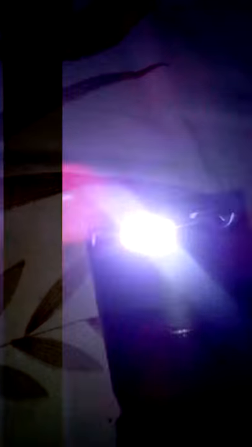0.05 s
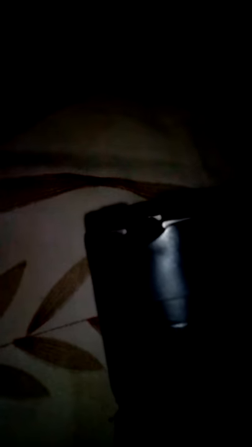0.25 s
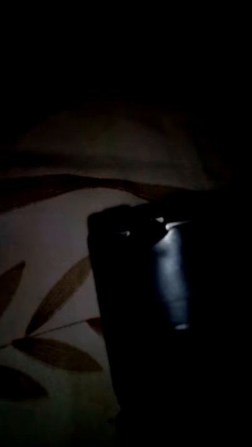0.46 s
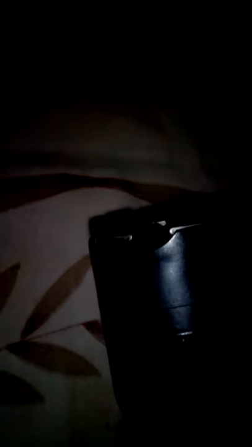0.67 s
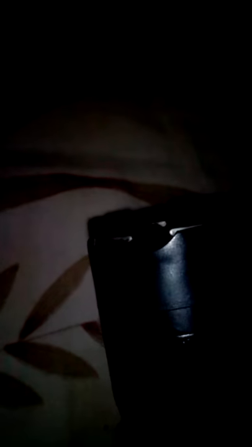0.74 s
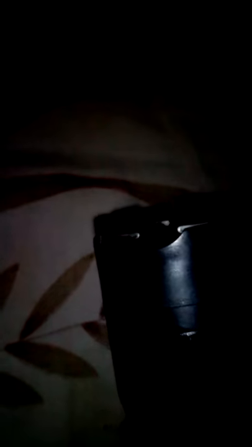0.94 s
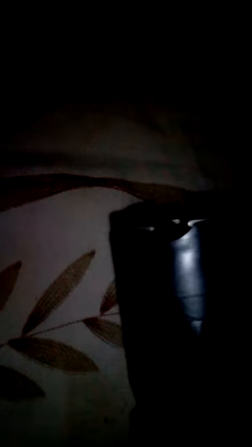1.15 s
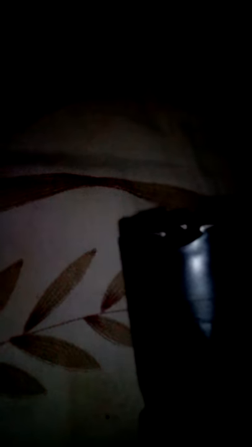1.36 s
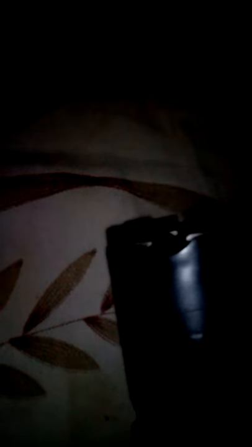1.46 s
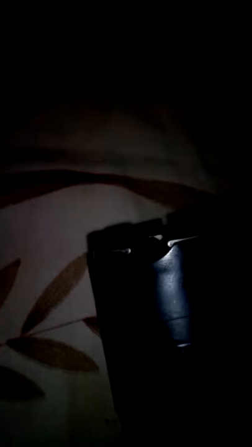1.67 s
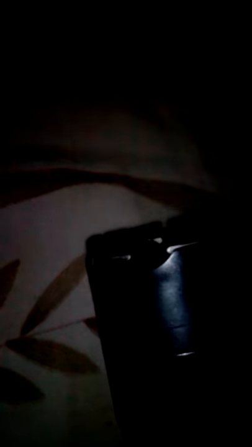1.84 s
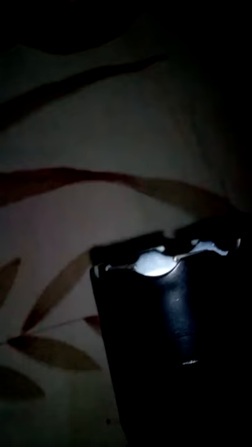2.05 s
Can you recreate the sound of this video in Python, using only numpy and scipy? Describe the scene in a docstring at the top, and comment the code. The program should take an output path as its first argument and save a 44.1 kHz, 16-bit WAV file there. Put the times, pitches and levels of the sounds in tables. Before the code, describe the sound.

Four very loud, dry electric cracks from a handheld stun device fire in quick succession near the start, overloading a close microphone; a short room tail fades into low hiss and soft handling bumps.

```python
"""Low hiss and soft bumps of handling come first, then four cracks of a handheld stun device near a microphone.
Each crack is a cluster of echoed impulses exciting resonators, over a low push from microphone overload;
band-filtered noise decaying exponentially is the brief answer of the quiet furnished room.
Weak sputters follow the second spark. Gated sinusoids make the bumps and a short hum, and a
decaying tone with noise makes each faint tick; spectrally shaped noise is the hiss of the recorder."""
import sys
import numpy as np
from scipy import signal
from scipy.fft import rfft, irfft
from scipy.io import wavfile

SR = 44100
rng = np.random.default_rng(int(sys.argv[2]) if len(sys.argv) > 2 else 0)


def natural_amplitude(level_db):
    """Convert a level in decibels to a linear amplitude factor, elementwise."""
    exponent = np.asarray(level_db, float) / 20
    return 10 ** exponent


def materialize(psi):
    """Save the field psi as 16-bit PCM at rate SR to the path in sys.argv[1].

    A 1-D psi becomes a single channel; in a 2-D psi each row is a channel.
    """
    bounded = np.clip(np.atleast_2d(psi).T, -1, 1)
    quanta = np.round(bounded * 32767).astype(np.int16)
    wavfile.write(sys.argv[1], SR, quanta)


N = 92610   # samples: 2.1 s

# sparks: [t/s, level/dB (sets the room; the crack itself is limited), signed drive of the low push,
#          duration of that drive/s, level of the lower ring against the upper/dB]
SPARKS = [(.2173, 1.4, 0.26, 0.0036, -7), (0.2524, 1.3, -0.26, 0.0017, -1.5),
          (0.2897, 2.4, 0.27, .003, -10.5), (0.3274, 2.44, -0.14, 0.00091, -7.5)]


def rms_one(x):
    """Normalisation: scale to a root mean square of 1."""
    return x / np.sqrt(np.mean(x ** 2) + 1e-20)


def at_hz(points, hz):
    """Linear interpolation of a table along a logarithmic frequency axis."""
    p = np.array(points, float)
    return np.interp(np.log(hz), np.log(p[:, 0]), p[:, 1])


def coloured(x, spectrum):
    """Spectral shaping: multiply the Fourier transform of noise by a magnitude response."""
    hz = np.maximum(np.arange(len(x) // 2 + 1) * SR / len(x), 1)
    return irfft(rfft(x) * natural_amplitude(at_hz(spectrum, hz)), len(x))


def drift(rate_hz, size):
    """Slow random fluctuation of rms 1: white noise through a double-pole low-pass."""
    r = np.exp(-2 * np.pi * rate_hz / SR)
    settled = signal.lfilter([1], [1, -2 * r, r * r], rng.standard_normal(size + SR))[SR:]
    return rms_one(settled)


def band_pass(x, low_hz, high_hz):
    """Butterworth band-pass: maximally flat between its two edges."""
    return signal.sosfilt(signal.butter(2, [low_hz, high_hz], "band", fs=SR, output="sos"), x)


def resonate(x, hz, width_hz):
    """Damped resonator: a unit impulse excites a decaying sine that starts from height 1."""
    r, w = np.exp(-np.pi * width_hz / SR), 2 * np.pi * hz / SR
    return signal.lfilter([0, np.sin(w)], [1, -2 * r * np.cos(w), r * r], x)


def add(out, s, x):
    """Superposition: mix x into out from time s."""
    i = int(s * SR)
    out[i:i + len(x)] += x[:max(len(out) - i, 0)]


def top_cut(x):
    """Band limiting: an elliptic low-pass forms the steep upper edge of the recorder."""
    return signal.sosfilt(signal.ellip(7, .5, 60, 8600, fs=SR, output="sos"), x)


def recorder_hiss():
    """Stationary random noise, with the coloured spectrum of the recorder."""
    # spectrum of the hiss: [f/Hz, relative level/dB]
    hiss_spectrum = [(150, -30), (300, -7.5), (450, -7), (650, -15), (1000, -12), (1810, -14.5),
                     (2300, -20), (3270, -22), (5500, -20.5), (7030, -14), (7700, -24), (8000, -35.5),
                     (8810, -37), (9300, -58), (16000, -60), (17000, -80), (22000, -72)]
    return natural_amplitude(-63.5) * rms_one(coloured(rng.standard_normal(N), hiss_spectrum))


def rumble():
    """Amplitude-modulated band noise: the restless, lumpy rumble of the hand."""
    # course of the rumble before lumps are normalised to it: [t/s, level/dB]
    rumble_course = [(0, -72), (.07, -67), (0.112, -47), (0.171, -52.5), (.2, -59), (.6, -59.5),
                     (0.718, -50.5), (.8, -57), (.97, -60), (1.1, -55), (1.3, -56), (1.42, -61),
                     (1.62, -55.5), (1.85, -58), (1.9, -53.5), (2.1, -62)]
    low_hz, high_hz, lumps_db, lumps_hz = 65.36, 234.3, 3, 30
    s, db = np.transpose(rumble_course)
    noise = band_pass(rng.standard_normal(N), low_hz, high_hz) * natural_amplitude(lumps_db * drift(lumps_hz, N))
    return rms_one(noise) * natural_amplitude(np.interp(np.arange(N) / SR, s, db))


def bumps():
    """Gaussian-windowed sinusoids whose falling instantaneous frequency gives each bump its sag."""
    # bumps of handling: [t/s at the top, level/dB of the fundamental, f/Hz at the top,
    #                     full width at half height/s]
    bump_events = [(0.11, -36.5, 193, 0.0054), (0.163, -33, 102, 0.0067), (0.392, -50, 133, 0.021),
                   (0.453, -44.5, 167, 0.0054), (0.519, -40, 136, 0.0091), (0.555, -45, 106, 0.023),
                   (0.654, -53, 123, 0.038), (0.693, -46, 173, 0.022), (0.732, -43, 127, 0.0086),
                   (0.757, -45, 150.5, 0.011), (0.843, -43, 133, 0.0066), (0.94, -50.5, 143, 0.025),
                   (1.017, -45, 141, 0.01), (1.038, -46, 157, 0.0088), (1.079, -41.5, 146, 0.0066),
                   (1.128, -45.5, 121, 0.017), (1.172, -46, 153.7, 0.022), (1.2, -37.5, 107.5, 0.0086),
                   (1.24, -72, 178, 0.058), (1.297, -35, 125, 0.005), (1.322, -38, 144, 0.003),
                   (1.345, -44.5, 118, 0.02), (1.49, -42, 129, 0.0054), (1.539, -45, 132, 0.01),
                   (1.574, -58, 152, 0.0093), (1.616, -43.5, 151.7, 0.03), (1.68, -48, 148.8, 0.0087),
                   (1.752, -62, 168, 0.0053), (1.792, -43, 214, 0.0074), (1.88, -45, 145, 0.014),
                   (1.906, -33.5, 184.8, 0.0064), (1.989, -52, 123.3, 0.016), (2.033, -49, 145, 0.019),
                   (2.057, -42.5, 162, 0.0083)]
    sag_per_s, overtone_db = 22, -19
    out, t = np.zeros(N), np.arange(-SR // 25, SR // 25) / SR
    for (s, db, hz, width), (phase, sag) in zip(bump_events, rng.random((len(bump_events), 2))):
        shape = .5 ** ((2 * t / width) ** 2)
        turn = 2 * np.pi * (phase + hz * t * (1 - sag_per_s * sag * t))
        overtone = natural_amplitude(overtone_db) * shape * np.sin(2 * turn + 2 * np.pi * sag)   # sharpens the bump
        add(out, s + t[0], natural_amplitude(db) * shape * (np.sin(turn) + overtone))
    return out


def ticks():
    """Exponential decay: a ringing tone and resonant noise fade together in each faint tick."""
    # ticks: [t/s, level/dB of the ring, f/Hz]
    tick_events = [(1.9395, -53, 3070), (.186, -68.5, 5800)]
    ring_t60_s, noise_db, noise_t60_s, attack_s = .035, 3, .022, 0.00089
    out, t = np.zeros(N), np.arange(SR // 10) / SR
    for s, db, hz in tick_events:
        noise = rng.standard_normal(len(t))
        noise = rms_one(resonate(resonate(noise, 6200, 2200), 6200, 2200))
        ring = natural_amplitude(-60 * t / ring_t60_s) * np.sin(2 * np.pi * hz * t)
        fading_noise = natural_amplitude(noise_db - 60 * t / noise_t60_s) * noise
        add(out, s, natural_amplitude(db) * np.minimum(t / attack_s, 1) * (ring + fading_noise))
    return out


def hum():
    """Harmonic series: whole multiples of one pitch swell and fade under a squared sine."""
    # stretches of hum: [t/s at the start, duration/s, f/Hz of the fundamental, reference level/dB]
    hum_stretches = [(0.756, 0.048, 286.6, -60.5), (.81, 0.047, 277.3, -67)]
    # harmonics: [multiple of the fundamental, level/dB against the reference]
    hum_harmonics = [(1, 5), (2, 1), (3, 5)]
    out, t = np.zeros(N), np.arange(SR // 10) / SR
    for s, length, hz, db in hum_stretches:
        shape = np.sin(np.pi * np.minimum(t / length, 1)) ** 2
        tones = sum(natural_amplitude(db + k_db) * np.sin(2 * np.pi * k * hz * t) for k, k_db in hum_harmonics)
        add(out, s, shape * tones)
    return out


def room():
    """Reverberation: grainy noise swells after each spark, then decays in two slopes in each band."""
    # spectrum of the room's answer: [f/Hz, relative level/dB]
    room_spectrum = [(250, -53.5), (700, -35), (1200, -27), (2090, -25.5), (3000, -21), (3950, -17.5),
                     (5390, -8), (6100, -5), (7300, -7.1), (7700, -0.5), (8050, -18.5), (8600, -19),
                     (11000, -49)]
    # first slope of the decay: [f/Hz, reverberation time T60/s]
    room_decay = [(400, 0.3), (1500, 0.2), (3500, .18), (7000, 0.17), (9000, .17)]
    room_db, delay_s, rise_s, grain_db = -14.5, .004, 0.0047, 1.5
    late_db, late_t60_s = -28.5, 0.467   # slower second slope, level against the first
    out, t = np.zeros(N), np.arange(SR // 2) / SR
    edges = 250 * 2 ** np.arange(0, 5.6, .5)   # half-octave bands, Hz
    swell = 1 - np.exp(-(t / rise_s) ** 2)
    for s, db, *_ in SPARKS:
        noise = rms_one(coloured(rng.standard_normal(len(t)), room_spectrum))
        noise = noise * natural_amplitude(grain_db * drift(250, len(t)))
        tail = 0
        for low, high in zip(edges, edges[1:]):
            early = natural_amplitude(-60 * t / at_hz(room_decay, np.sqrt(low * high)))
            late = natural_amplitude(late_db - 60 * t / late_t60_s)
            tail = tail + band_pass(noise, low, high) * (early + late)
        add(out, s + delay_s, natural_amplitude(db + room_db) * tail * swell)
    return out


def crack(clicks, lower_db):
    """Modal excitation: clicks ring the resonances of device and microphone; peak 1 after the top cut."""
    # lesser resonances: [f/Hz, bandwidth/Hz, level/dB against the upper ring]
    lesser_rings = [(1250, 380, -14.5), (2203, 730, -15), (3410, 160, -22.5), (4440, 1200, -16)]
    rings = [(6930, 510, 0), (5384, 740, lower_db)] + lesser_rings   # upper ring, lower ring, the rest
    x = 0
    for k, (hz, width_hz, db) in enumerate(rings):
        x = x + natural_amplitude(db) * (-1) ** k * resonate(clicks, hz, width_hz)   # signs alternate
    first = clicks * (np.cumsum(clicks != 0) == 1)
    x = x + natural_amplitude(-0.5) * band_pass(first, 594.9, 2050)   # broad middle of the first arrival
    x = signal.sosfilt(signal.cheby2(4, 20, 8546, fs=SR, output="sos"), x)   # upper shoulder
    x = x + natural_amplitude(-20.5) * resonate(clicks, 8570, 300)   # ring above the shoulder
    x = np.tanh(1.6 * x / np.abs(x).max())   # the capsule rounds the highest peaks
    return x / np.abs(top_cut(x)).max()


def sputters():
    """Excitation by differentiated noise bursts: weak discharges between sparks, with little body."""
    # weak discharges: [t/s, level/dB at the peak]
    sputter_events = [(.2639, -15), (.2651, -11), (.2663, -13)]
    burst_s = .0005
    out, t = np.zeros(N), np.arange(SR // 20) / SR
    for s, db in sputter_events:
        clicks = np.diff(rng.standard_normal(len(t)) * (t < burst_s), prepend=0)
        add(out, s, natural_amplitude(db) * crack(clicks, SPARKS[1][4]))
    return out


def sparks():
    """Early reflection and overload: clustered arrivals crack over a high-passed push that swings back."""
    # arrivals of one crack from near surfaces: [delay t/s, level/dB], both scattered below
    arrivals = [(0, -2.1), (.00028, -3.5), (.00069, 2), (.00110, -2), (.00207, -11.5), (.00248, -15),
                (.00317, -17), (.00358, -14)]
    scatter_s, scatter_db = .000012, 2.5
    push_cut_hz, push_damping = 70, .55
    push_lean = 0.51   # under 1: the push rises faster than it falls
    saturation_db = .3
    out, t = np.zeros(N), np.arange(SR // 20) / SR
    w = 2 * np.pi * push_cut_hz
    swing = signal.bilinear([1, 0, 0], [1, 2 * push_damping * w, w * w], SR)
    for s, db, height, length, lower_db in SPARKS:
        chance, clicks = rng.standard_normal((len(arrivals), 2)), np.zeros(len(t))
        for (lag, lag_db), (early, loud) in zip(arrivals, chance):
            add(clicks, abs(lag + scatter_s * early), [natural_amplitude(lag_db + scatter_db * loud)])
        drive = np.sin(np.pi * np.minimum(t / length, 1) ** push_lean)
        push = height * signal.lfilter(*swing, drive)
        snap = np.sign(height) * crack(clicks, lower_db)
        heard = top_cut(snap)
        # push and crack together reach the peak, at most saturation
        headroom = (natural_amplitude(min(db, saturation_db)) - push * np.sign(heard)) / (np.abs(heard) + 1e-9)
        add(out, s, headroom.min() * snap + push)
    return out


def scene():
    """Linear superposition of all sources in one channel."""
    return (rumble() + bumps() + ticks() + hum() + room() + sputters() + sparks())[None]


def band_limit(x):
    """A steep low-pass at the top of the band."""
    return signal.sosfilt(signal.butter(12, 8960, fs=SR, output="sos"), x)


def record(dry):
    """Band limiting, additive noise and hard clipping at full scale in the recorder."""
    noisy = top_cut(dry) + recorder_hiss()
    mix = np.clip(noisy, -1.0, 1.0)
    return band_limit(mix)


dry = scene()
out = record(dry)
materialize(out)
```